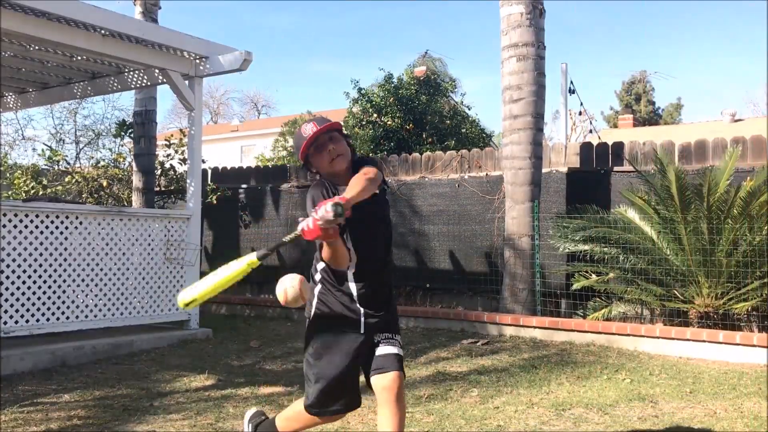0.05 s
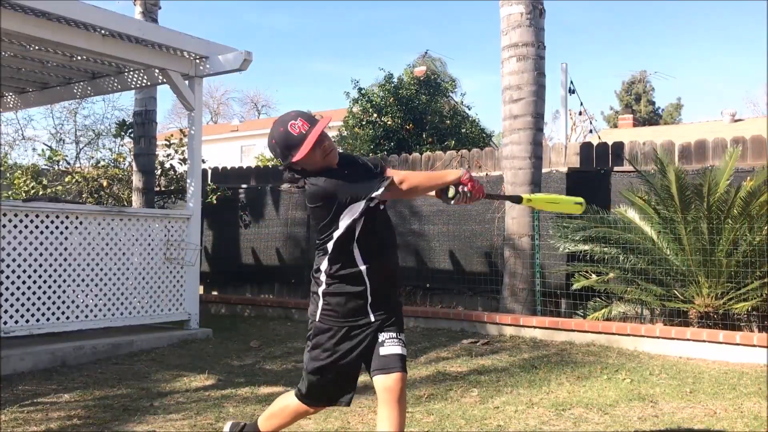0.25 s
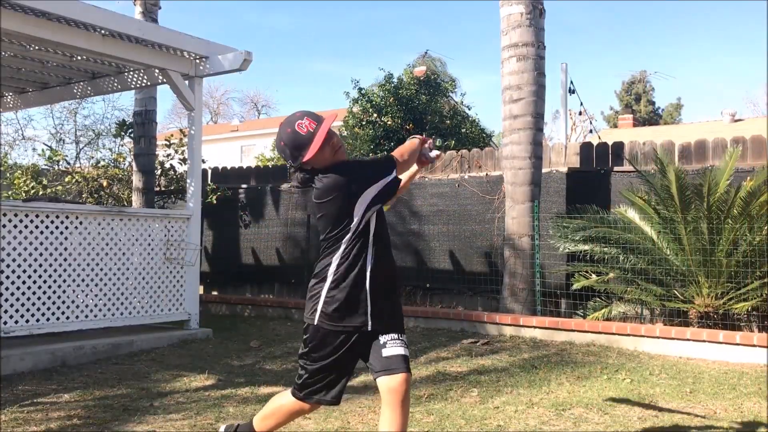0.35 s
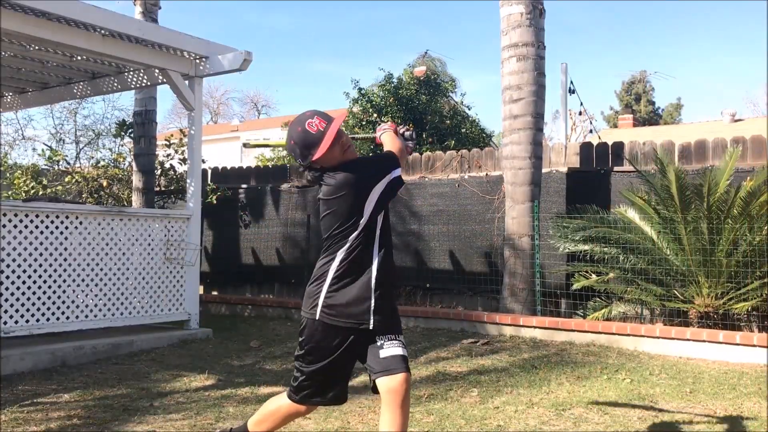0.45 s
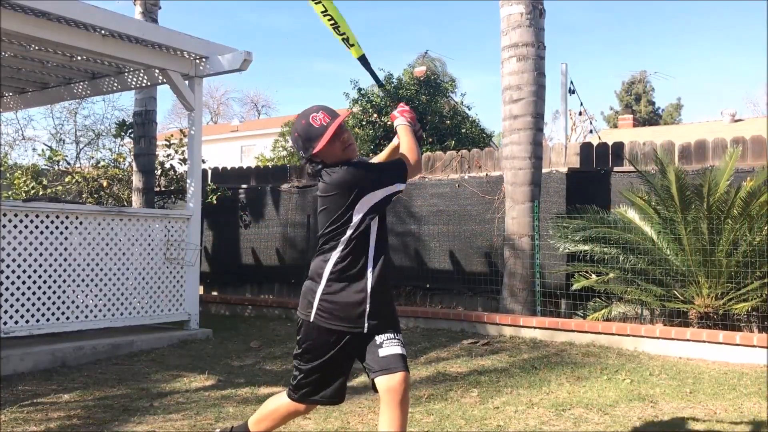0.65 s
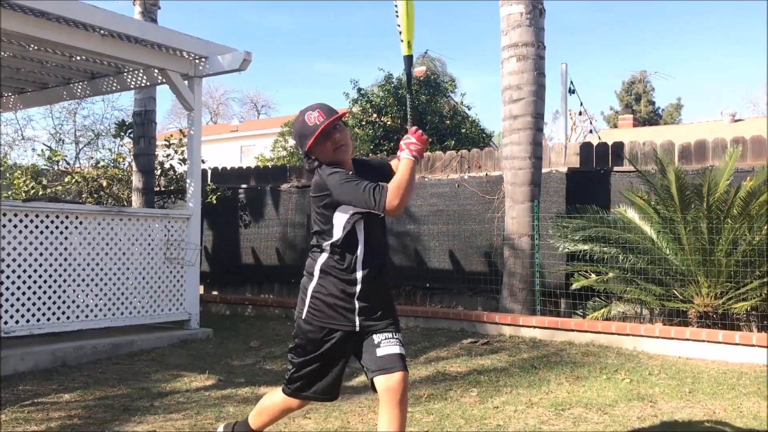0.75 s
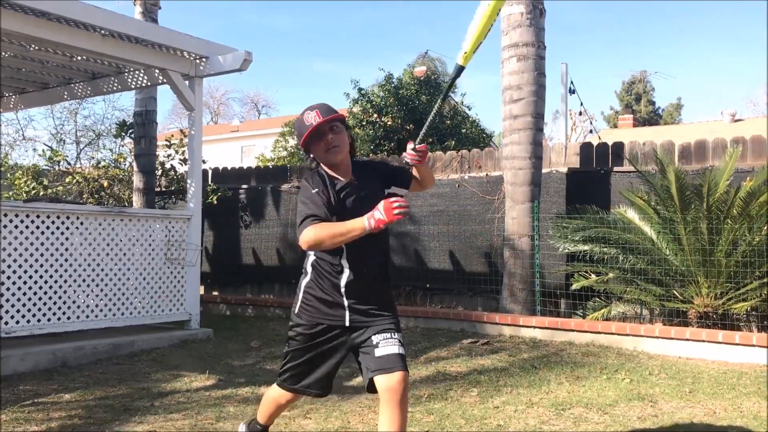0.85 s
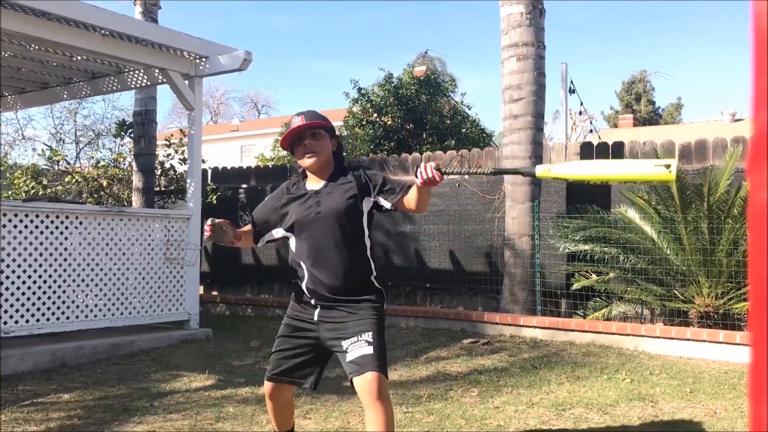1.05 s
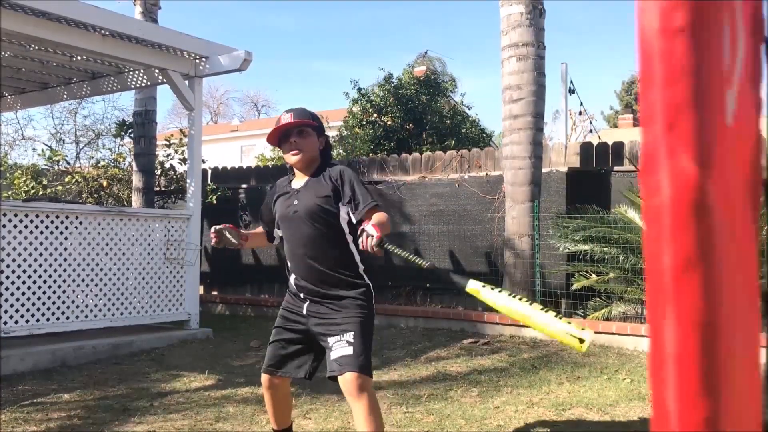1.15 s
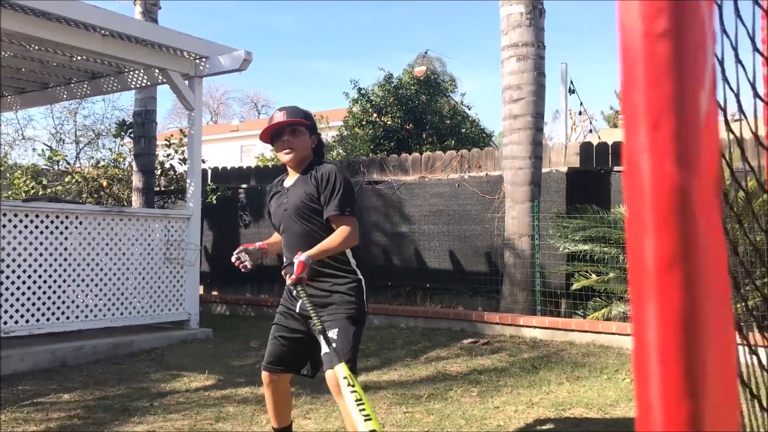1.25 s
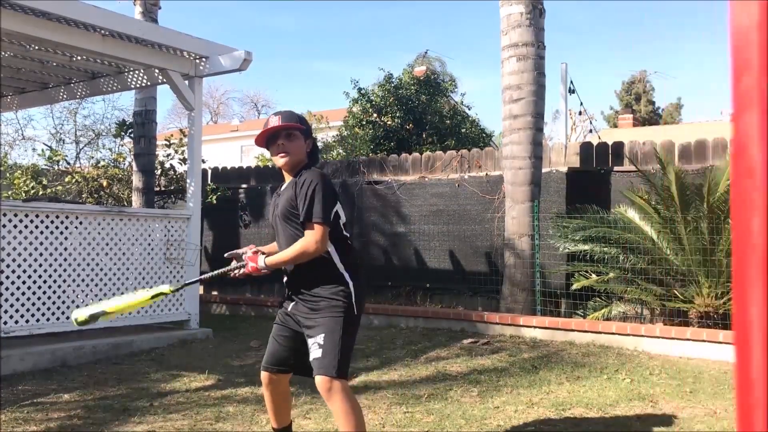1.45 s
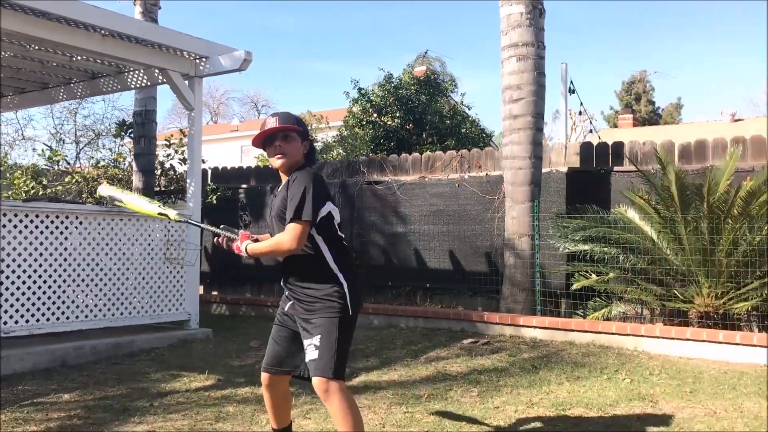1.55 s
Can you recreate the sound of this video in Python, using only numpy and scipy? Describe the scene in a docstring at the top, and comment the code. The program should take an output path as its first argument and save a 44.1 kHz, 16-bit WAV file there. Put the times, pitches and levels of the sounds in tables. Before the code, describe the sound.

A baseball bat hits a ball with one sharp crack and a brief ping.

```python
"""A bat hits a tossed baseball in a backyard: a hard crack as the ball squashes and springs off,
and a brief ping from the barrel's modes. Fence and house walls throw both back.
Soft knocks follow as the ball lands and the batter steps, and a practice net's frame rings faintly.
Clothes and dry grass rustle over far traffic and a low, distant hum."""
import sys
import numpy as np
from scipy import signal
from scipy.fft import rfft, irfft
from scipy.io import wavfile
from scipy.ndimage import map_coordinates

SR = 44100
rng = np.random.default_rng(int(sys.argv[2]) if len(sys.argv) > 2 else 0)


def persist_wave(psi):
    """Save psi, clipped to +-1, as 16-bit WAV."""
    counts = np.round(np.clip(psi, -1, 1) * 32767).astype(np.int16)
    wavfile.write(sys.argv[1], SR, np.atleast_2d(counts).T)


N = 70560


def amp(db):
    """Decibels to gain."""
    return 10 ** (np.asarray(db) / 20)


def unit(x):
    """Scale to rms 1."""
    return x / np.sqrt(np.mean(x ** 2) + 1e-20)


def since(start_s):
    """Seconds since start_s, zero before it."""
    return np.maximum(np.arange(N) / SR - start_s, 0)


def wobble(rate_hz):
    """Smooth random curve, rate_hz knots a second."""
    return map_coordinates(rng.standard_normal(1024), [np.arange(N) * rate_hz / SR], mode="wrap")


def colour(x, spectrum):
    """Minimum-phase filter of unit mean power through (frequency [Hz], level [dB]) points."""
    size = 2 * N
    hz, db = np.transpose(spectrum)
    log_bins = np.log(np.fft.rfftfreq(size, 1 / SR) + 1)
    gain = unit(amp(np.interp(log_bins, np.log(hz), db)))
    cepstrum = irfft(np.log(gain + 1e-6), size)
    cepstrum[1:N] *= 2
    cepstrum[N + 1:] = 0
    return irfft(rfft(x, size) * np.exp(rfft(cepstrum)), size)[:N]


def noise(spectrum):
    """Coloured noise of rms 1."""
    return unit(colour(rng.standard_normal(N), spectrum))


def burst(start_s, length_s):
    """Short pressure burst: unit energy, even spectrum."""
    window = np.exp(-(np.arange(2048) / SR / length_s) ** 4)
    pulse = rng.standard_normal(len(window)) * window
    for _ in range(12):  # flatten the spectrum
        pulse = irfft(np.exp(1j * np.angle(rfft(pulse)))) * window
    return np.pad(pulse / np.linalg.norm(pulse), (int(start_s * SR), N))[:N]


HIT_S, BALL_LAG_S, BALL_LENGTH_S = 0.2447, 0.0011, 0.0016
# first-contact spectrum (frequency [Hz], level [dB])
SNAP_SPECTRUM = [(200, -35.5), (1000, -17.5), (3500, 0.5), (5200, -2.5), (6500, -20), (9500, -10),
                 (12000, -19), (16000, -7)]
# ball pop spectrum (frequency [Hz], level [dB])
BALL_SPECTRUM = [(30, -15.5), (70, -17.5), (170, -1), (300, -7.5), (480, 2.5), (820, 0.5), (1450, -10.5),
                 (2200, -4.5), (3000, -2), (4600, -8), (6200, -23.5), (16000, -33.5)]
def crack(snap_db=1.5, snap_s=0.0009, pop_db=8, scatter_t60_s=0.035):
    """Bright contact, the pop of the squashed ball, then scatter off ground and batter."""
    t = since(HIT_S + BALL_LAG_S + BALL_LENGTH_S)
    scatter = noise(BALL_SPECTRUM) * (t > 0) * amp(-60 * t / scatter_t60_s)
    snap = amp(snap_db) * colour(burst(HIT_S, snap_s), SNAP_SPECTRUM)
    pop = amp(pop_db) * colour(burst(HIT_S + BALL_LAG_S, BALL_LENGTH_S), BALL_SPECTRUM)
    return snap + pop + scatter / np.linalg.norm(scatter)


# barrel modes (frequency [Hz], level [dB], t60 [s])
BARREL_MODES = [(2009, -5.5, 0.095), (2163, -17, .16), (2950, -9, 0.033), (3145, -21.5, 0.2),
                (4940, -10.5, 0.033), (7840, -30, 0.03), (8820, -19.5, .03)]
def ping(start_s, rise_s, gain_db, spread_db=0.5):
    """The barrel's modes ring out, each a little different in every direction."""
    t = since(start_s)
    ring = np.zeros(N)
    for hz, db, t60_s in BARREL_MODES:
        envelope = amp(db - spread_db * rng.standard_normal() - 60 * t / t60_s)
        ring += envelope * np.sin(2 * np.pi * (hz * t + rng.random()))
    return amp(gain_db) * ring * (1 - np.exp(-t / rise_s))


# bat swish spectrum (frequency [Hz], level [dB])
SWISH_SPECTRUM = [(80, -2), (250, -2), (700, -3.5), (1500, -19), (3000, -16.5), (8000, -34.5)]
def swing(swish_db=-47.5, swish_s=0.025, push_db=-31.5, push_hz=108, push_decay_s=0.0086):
    """The bat swishes past; the blow gives the air one low push."""
    t = since(HIT_S)
    swish = noise(SWISH_SPECTRUM) * amp(swish_db) * np.exp(-np.abs(since(0) - HIT_S) / swish_s)
    push = amp(push_db) * np.exp(-t / push_decay_s) * np.sin(2 * np.pi * push_hz * t)
    return swish + push


# reflected crack spectrum (frequency [Hz], level [dB])
SLAP_SPECTRUM = [(100, -10), (700, 3), (1500, -4.5), (4600, -4.5), (6300, -16.5), (9000, -24),
                 (16000, -21.5)]
# wall echoes (time [s], crack gain [dB], ping gain [dB], high-pass [Hz], low-pass [Hz], smear [s])
WALL_ECHOES = [(.2638, -0.5, -12, 495, 14860, 0.0029), (0.273, -6, -38, 890, 10040, 0.0034),
               (.2802, -6.5, -40, 300, 1800, 0.0013), (.2932, -9, -16.5, 300, 1800, 0.0025),
               (.3016, -4, -40, 2350, 9800, 0.0045), (.3072, -10, -25.5, 203, 4000, 0.0043),
               (.3155, -3, -26.5, 1420, 4000, 0.0034), (.3285, -16, -24.5, 900, 6100, 0.0018),
               (.3455, -18, -31, 400, 2180, 0.007), (.3582, -19, -22.5, 247, 2210, 0.0012)]
def walls():
    """Fence and walls return crack and ping, smeared, thinned and dulled."""
    out = np.zeros(N)
    for start_s, crack_db, ping_db, highpass_hz, lowpass_hz, smear_s in WALL_ECHOES:
        highpass = signal.butter(2, highpass_hz, "high", fs=SR, output="sos")
        lowpass = signal.butter(3, lowpass_hz, "low", fs=SR, output="sos")
        slap = signal.sosfilt(highpass, colour(burst(start_s, smear_s), SLAP_SPECTRUM))
        ring = ping(start_s, rise_s=0.3 * smear_s, gain_db=ping_db)
        out += signal.sosfilt(lowpass, amp(crack_db) * slap + ring)
    return out


# reverberation spectrum (frequency [Hz], level [dB])
REVERB_SPECTRUM = [(60, -15.5), (170, 6), (400, 0.5), (700, -7), (1200, 7), (1550, -3.5), (2100, 11.5),
                   (2550, 5), (3100, 4), (4000, -2), (5100, -11.5), (6300, -14.5), (9000, -25),
                   (15000, -23)]
def yard_reverb(rise_s=0.0085, hold_s=0.065, yard_db=-35, yard_t60_s=0.37, far_db=-39.5, far_t60_s=0.87):
    """Diffuse sound in the yard builds, holds and dies; farther houses add a longer tail."""
    t = since(HIT_S)
    yard = noise(REVERB_SPECTRUM) * amp(yard_db - 60 * since(HIT_S + hold_s) / yard_t60_s)
    far = noise(REVERB_SPECTRUM) * amp(far_db - 60 * t / far_t60_s)
    return (yard + far) * (1 - np.exp(-t / rise_s))


# lingering ping tones (frequency [Hz], level [dB], t60 [s])
LINGER_TONES = [(1999, -34.5, 0.66), (2138, -42, 0.81), (3100, -49, .35), (3805, -47, 0.63),
                (5260, -48, 0.69)]
def lingering_ping(rise_s=0.15, waver_depth=0.48, waver_hz=21.3):
    """The ping lingers between the walls, wavering in level and phase."""
    t = since(HIT_S)
    out = np.zeros(N)
    for hz, db, t60_s in LINGER_TONES:
        waver = 1 + waver_depth * (wobble(waver_hz) + 1j * wobble(waver_hz))
        out += amp(db - 60 * t / t60_s) * np.real(waver * np.exp(2j * np.pi * hz * t))
    return out * (1 - np.exp(-t / rise_s))


# late echoes (time [s], level [dB], frequency [Hz], width [s])
LATE_ECHOES = [(.312, -31.5, 2210, .01), (0.351, -30, 2165, 0.0075), (0.382, -43.5, 2078, 0.012),
               (.4005, -36, 4060, 0.00081), (0.486, -45, 2180, .016), (0.539, -49, 2182, 0.016),
               (0.619, -58, 2050, 0.014), (.69, -62.5, 2160, 0.0096)]
def late_echoes(waver_rad=0.51, waver_hz=150):
    """Soft swells of the ping off distant houses, and one short, bright tick near 4 kHz."""
    t = since(0)
    out = np.zeros(N)
    for peak_s, db, hz, width_s in LATE_ECHOES:
        envelope = amp(db) * np.exp(-((t - peak_s) / width_s) ** 2 / 2)
        out += envelope * np.sin(2 * np.pi * (hz * t + rng.random()) + waver_rad * wobble(waver_hz))
    return out


# contact noise spectrum (frequency [Hz], level [dB])
CONTACT_SPECTRUM = [(100, -44), (440, 14), (750, -8), (1400, 5), (2500, -12.5), (6000, -19), (15000, -39)]
# ball and foot landings (time [s], envelope peak [dB], frequency [Hz], rise [s], contact noise [dB])
LANDINGS = [(.072, -44.5, 136, 0.003, -58), (0.5424, -46, 364, 0.0028, -68),
            (0.7117, -37.5, 144, .004, -82), (0.793, -38, 343, 0.0032, -48),
            (0.881, -41.5, 149, 0.0066, -74), (0.9379, -30, 275, 0.004, -54),
            (0.9427, -28, 134, 0.0055, -66), (0.974, -40, 95, 0.0095, -78),
            (1.008, -34.5, 202, 0.0059, -52.5), (1.034, -39.5, 204, 0.0042, -56)]
def knocks(contact_t60_s=0.1):
    """Ball and feet land: a few low cycles and a puff of contact noise."""
    out = np.zeros(N)
    for start_s, db, hz, rise_s, contact_db in LANDINGS:
        t = since(start_s)
        swell = (t / rise_s * np.exp(1 - t / rise_s)) ** 1.85
        out += amp(db) * swell * np.sin(2 * np.pi * hz * t)
        out += amp(contact_db - 60 * t / contact_t60_s) * (t > 0) * noise(CONTACT_SPECTRUM)
    return out


# net frame modes (frequency [Hz], level [dB], t60 [s])
FRAME_MODES = [(182, -45, 0.36), (240.3, -47, 0.61), (321.7, -52.5, 0.45)]
def net_frame(start_s=1.008):
    """The practice net's frame rings low and faint after a thud."""
    t = since(start_s)
    return sum(amp(db - 60 * t / t60_s) * np.sin(2 * np.pi * hz * t) for hz, db, t60_s in FRAME_MODES)


# tick spectrum (frequency [x brightest], level [dB])
TICK_SHAPE = [(.1, -10.5), (.45, -2), (1, 1.5), (1.7, -6.5), (4.5, -26.5)]
# grass ticks (time [s], level [dB], decay [s], brightest [Hz])
GRASS_TICKS = [(0.5427, -46, 0.0027, 3630), (0.6218, -53.5, 0.0025, 5000), (0.681, -63, 0.02, 4470),
               (0.937, -46.5, 0.0021, 4300), (1.011, -58, 0.018, 6860), (1.043, -54, 0.017, 2630),
               (1.567, -48.5, 0.0017, 3230)]
def grass_ticks():
    """Dry grass ticks and scuffs: fast-decaying noise."""
    out = np.zeros(N)
    for start_s, db, decay_s, bright_hz in GRASS_TICKS:
        t = since(start_s)
        spectrum = [(ratio * bright_hz, level_db) for ratio, level_db in TICK_SHAPE]
        out += amp(db) * (t > 0) * np.exp(-t / decay_s) * noise(spectrum)
    return out


# rustle and air spectrum (frequency [Hz], level [dB])
RUSTLE_SPECTRUM = [(200, -17.5), (480, -12), (620, -11.5), (900, -8), (1700, -14), (3200, -18), (8000, -25),
                   (15500, -28.5)]
# rustle envelope (time [s], level [dB])
RUSTLE_LEVELS = [(0, -69.5), (.05, -56), (.09, -67.5), (.2, -62.5), (.5, -60.5), (.75, -65.5), (.85, -64),
                 (.98, -65.5), (1.05, -62.5), (1.17, -66), (1.37, -60.5), (1.5, -68), (1.6, -63)]
def rustle(flicker_db=1, flicker_hz=59.81):
    """Moving clothes and grass, with outdoor air: noise of flickering level."""
    level_db = np.interp(since(0), *np.transpose(RUSTLE_LEVELS))
    return noise(RUSTLE_SPECTRUM) * amp(level_db + flicker_db * wobble(flicker_hz))


# snapping grass spectrum (frequency [Hz], level [dB])
CRACKLE_SPECTRUM = [(500, -4), (2000, -5.5), (4500, 0.5), (9000, -8.5), (15000, -6)]
def grass_crackle(snaps_per_s=44, snap_s=0.0009, spread_db=2, relative_db=-11.5):
    """Dry blades snap underfoot at random; their level follows the rustle."""
    snaps = (rng.random(N) < snaps_per_s / SR) * amp(spread_db * rng.standard_normal(N))
    grains = signal.fftconvolve(snaps, burst(0, snap_s))[:N]
    rustle_db = np.interp(since(0), *np.transpose(RUSTLE_LEVELS))
    return unit(colour(grains, CRACKLE_SPECTRUM)) * amp(rustle_db + relative_db)


def hum_tone(hz, waver_depth=0.083, waver_hz=8.57, drift_rad=0.77, drift_hz=2.3):
    """Sine of rms near 1, wandering in level and phase."""
    level = np.sqrt(2) * (1 + waver_depth * wobble(waver_hz))
    return level * np.sin(2 * np.pi * hz * since(0) + drift_rad * wobble(drift_hz))


# hum tones (frequency [Hz], rms level [dB])
HUM_TONES = [(73.5, -62), (134.6, -62), (222, -76), (270, -73)]
def distant_hum(drone_hz=397, drone_db=-65, peak_s=0.98, width_s=0.21):
    """Low sustained tones; a faint higher one swells and fades."""
    hum = sum(amp(db) * hum_tone(hz) for hz, db in HUM_TONES)
    swell = np.exp(-((since(0) - peak_s) / width_s) ** 2 / 2)
    return hum + amp(drone_db) * swell * hum_tone(drone_hz)


# traffic spectrum (frequency [Hz], level [dB])
TRAFFIC_SPECTRUM = [(20, -31), (45, -14.5), (70, 3), (95, -3), (135, -9.5), (200, -10.5), (350, -16.5),
                    (600, -41), (1500, -63.5)]
def traffic(rms_db=-59.5):
    """Steady rumble of far traffic."""
    return amp(rms_db) * noise(TRAFFIC_SPECTRUM)


def scene():
    """Mono sum at one microphone."""
    hit = swing() + crack() + ping(HIT_S, rise_s=BALL_LENGTH_S, gain_db=-22)
    echoes = walls() + yard_reverb() + lingering_ping() + late_echoes()
    movement = knocks() + net_frame() + grass_ticks() + rustle() + grass_crackle()
    return (hit + echoes + movement + distant_hum() + traffic())[None]


def record(dry, ceiling=0.52, cutoff_hz=15900):
    """Soft clip, then a steep low-pass."""
    clipped = dry / (1 + np.abs(dry / ceiling) ** 6) ** (1 / 6)
    hz = np.fft.rfftfreq(2 * N, 1 / SR)
    lowpass = 1 / np.sqrt(1 + (hz / cutoff_hz) ** 160)
    return irfft(rfft(clipped, 2 * N) * lowpass, 2 * N)[:, :N]


dry = scene()
out = record(dry)
persist_wave(out)
```